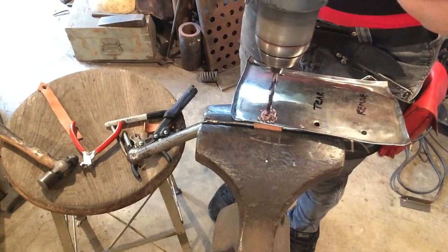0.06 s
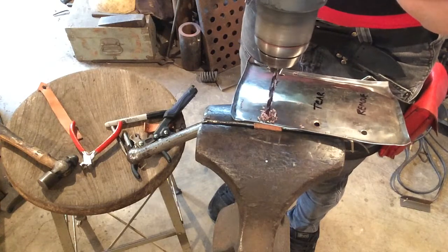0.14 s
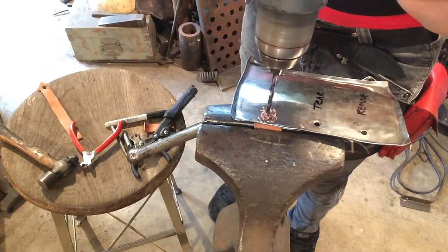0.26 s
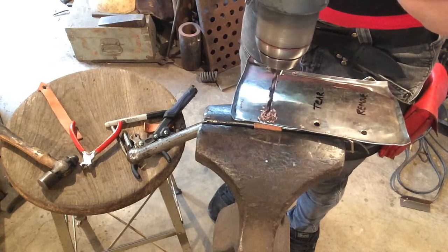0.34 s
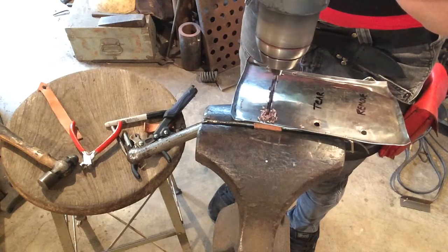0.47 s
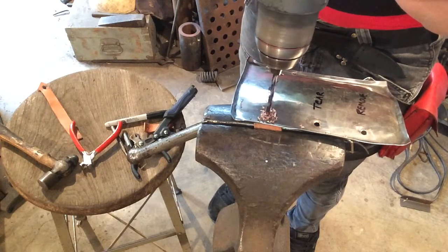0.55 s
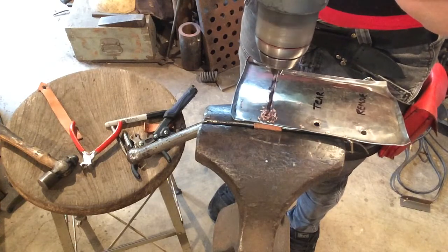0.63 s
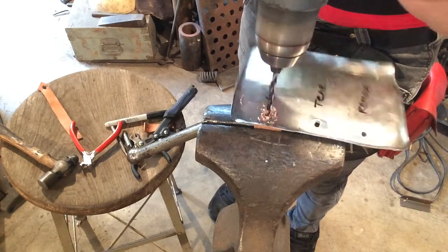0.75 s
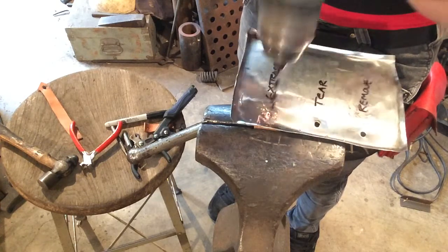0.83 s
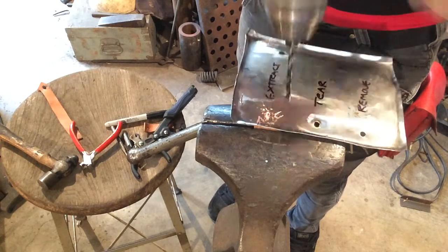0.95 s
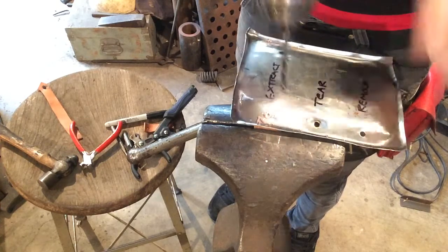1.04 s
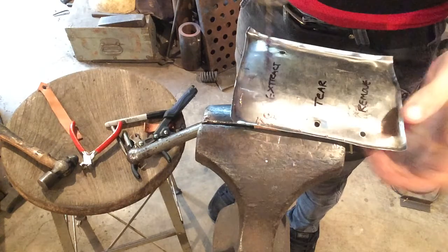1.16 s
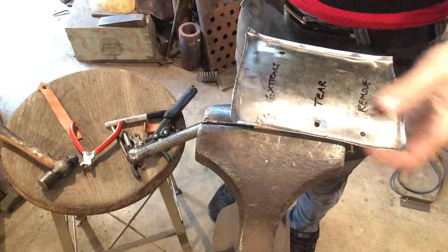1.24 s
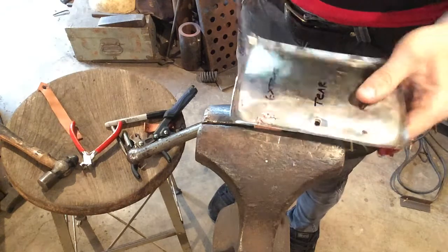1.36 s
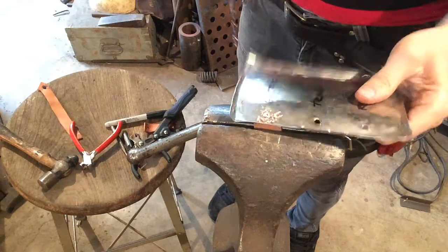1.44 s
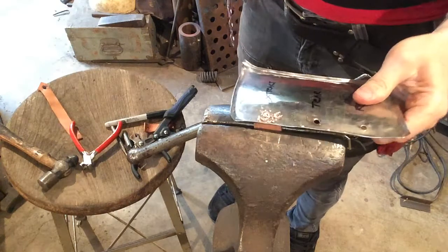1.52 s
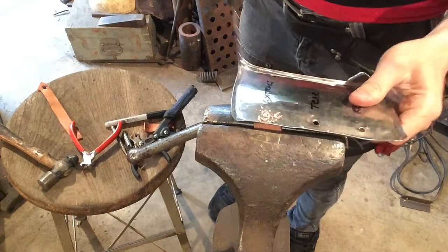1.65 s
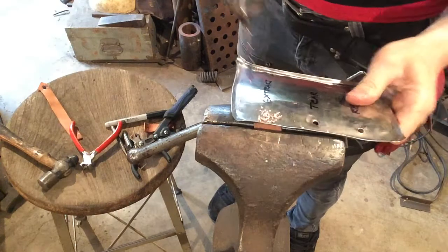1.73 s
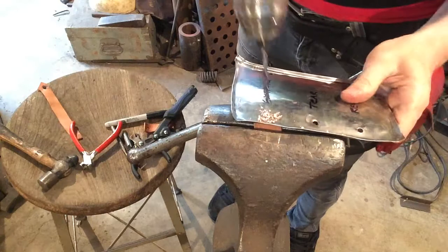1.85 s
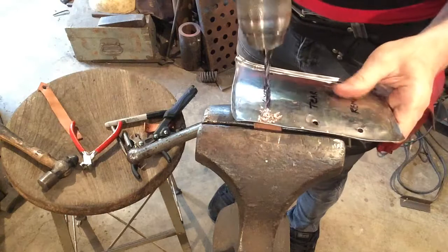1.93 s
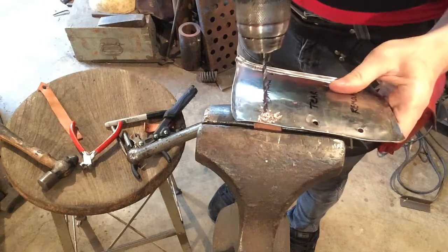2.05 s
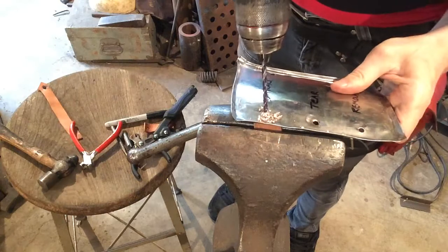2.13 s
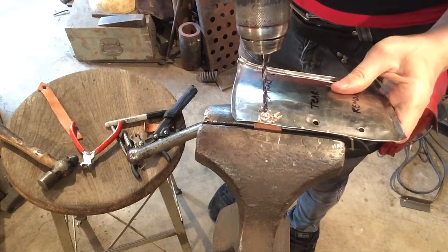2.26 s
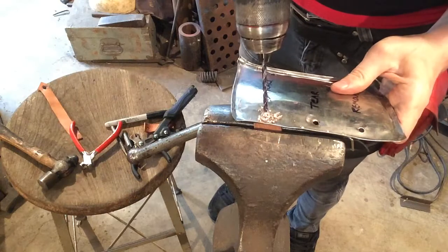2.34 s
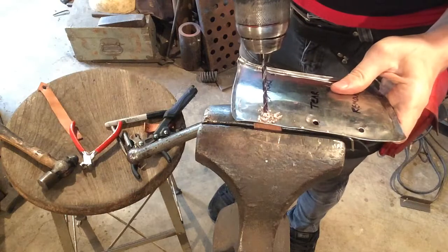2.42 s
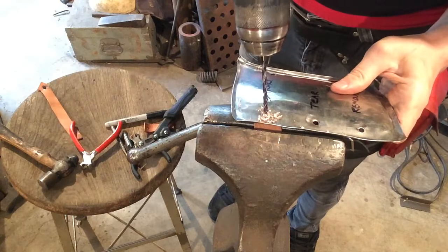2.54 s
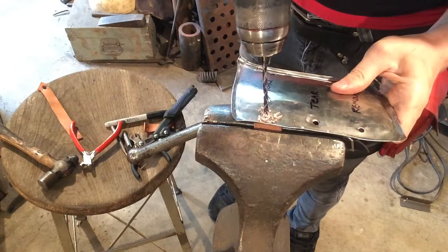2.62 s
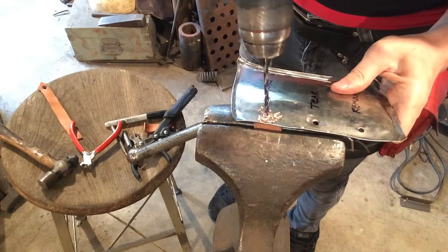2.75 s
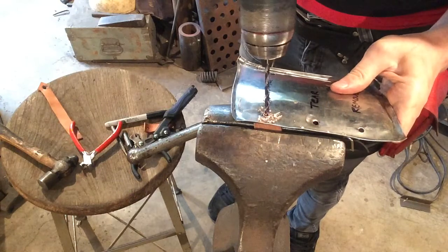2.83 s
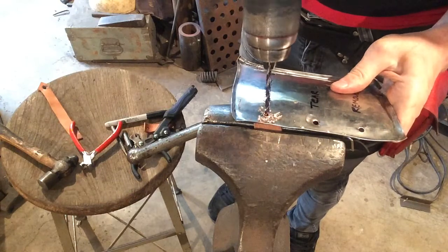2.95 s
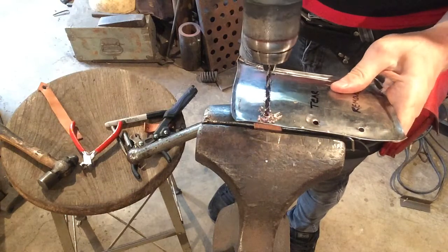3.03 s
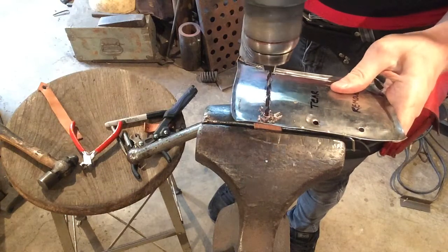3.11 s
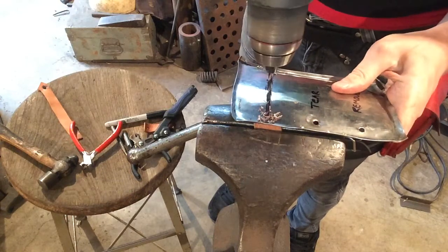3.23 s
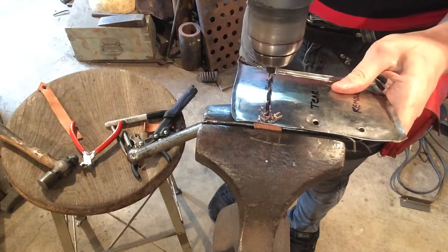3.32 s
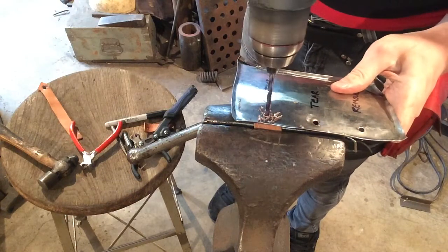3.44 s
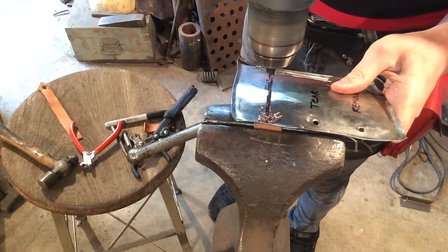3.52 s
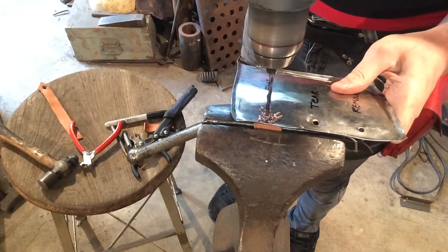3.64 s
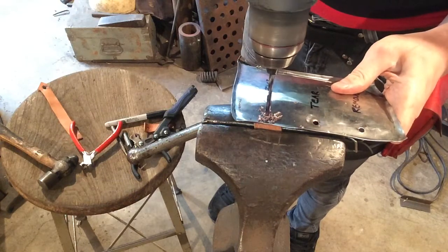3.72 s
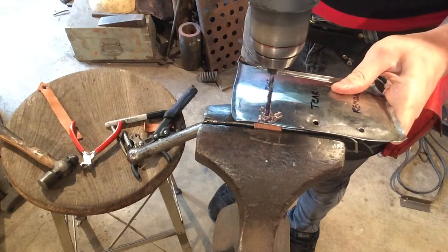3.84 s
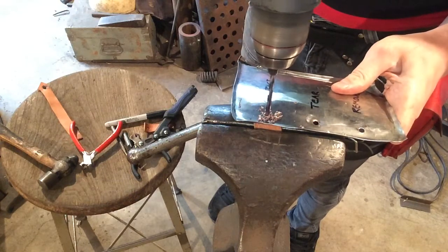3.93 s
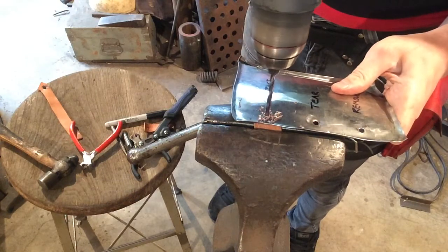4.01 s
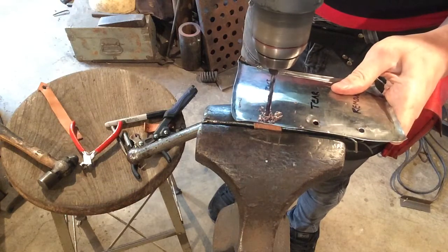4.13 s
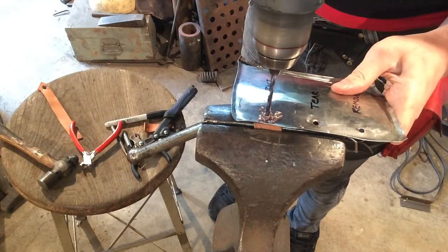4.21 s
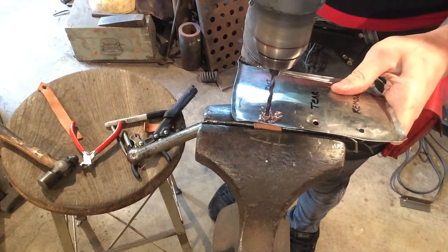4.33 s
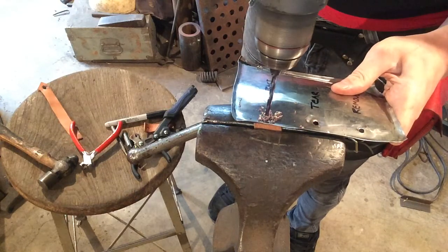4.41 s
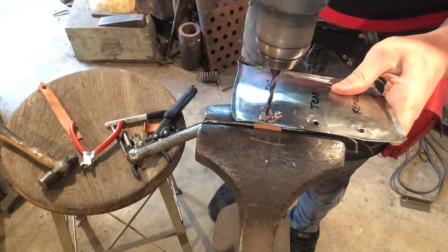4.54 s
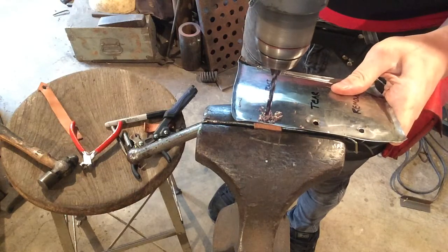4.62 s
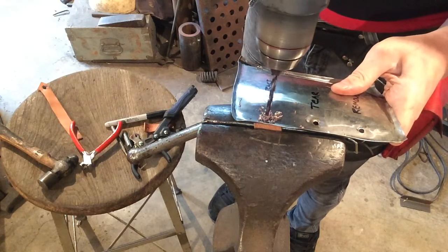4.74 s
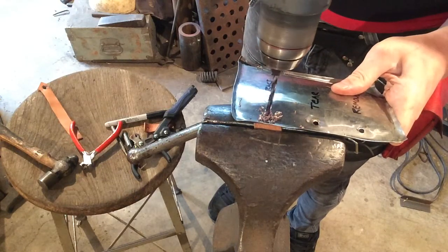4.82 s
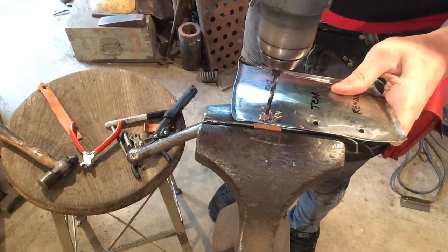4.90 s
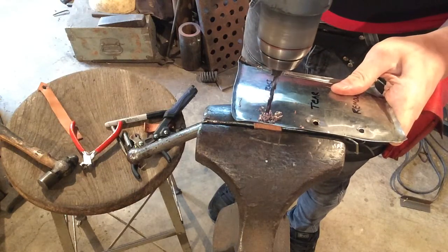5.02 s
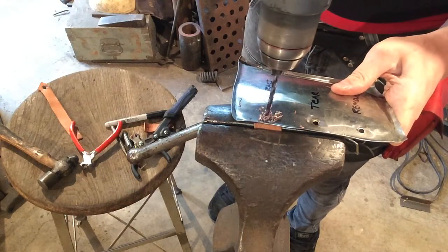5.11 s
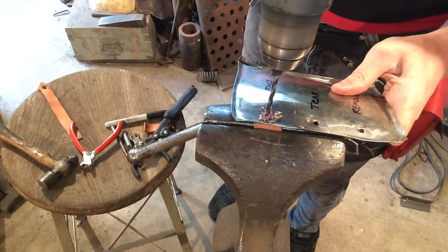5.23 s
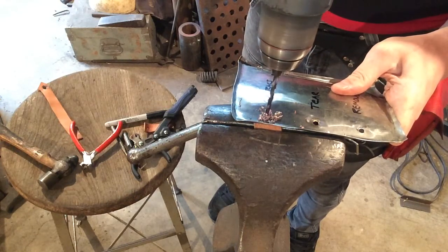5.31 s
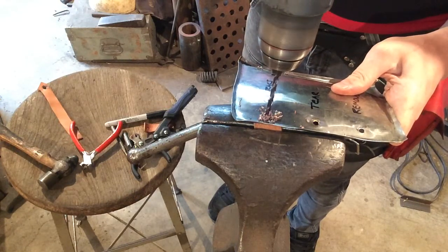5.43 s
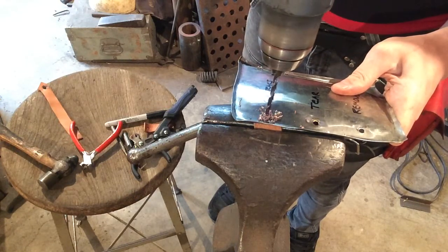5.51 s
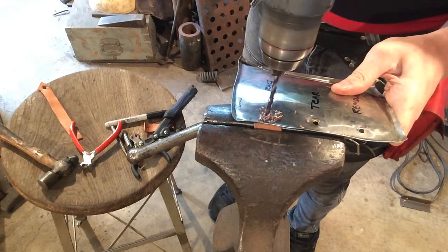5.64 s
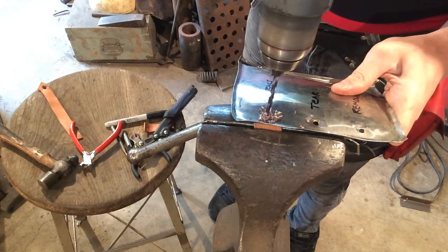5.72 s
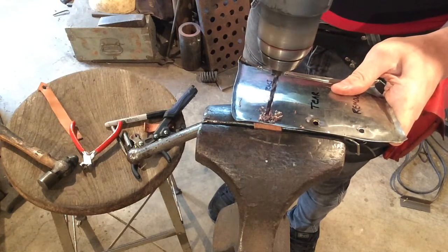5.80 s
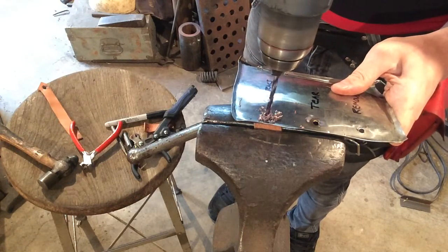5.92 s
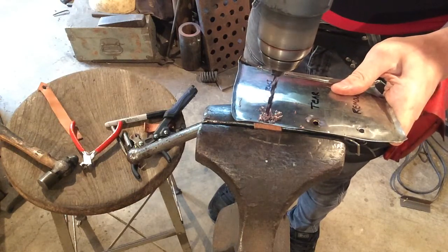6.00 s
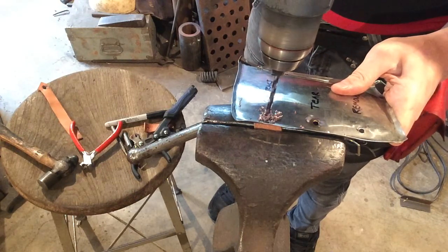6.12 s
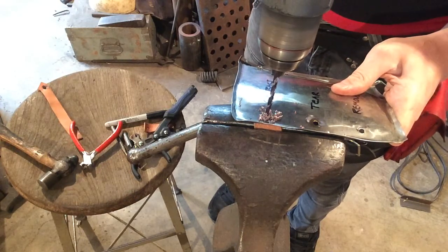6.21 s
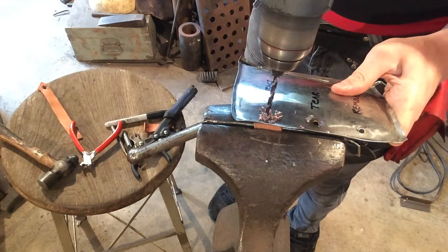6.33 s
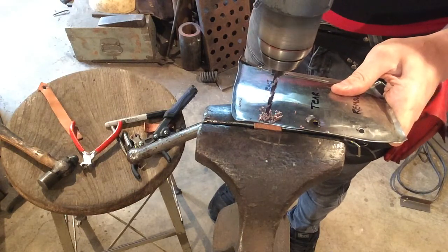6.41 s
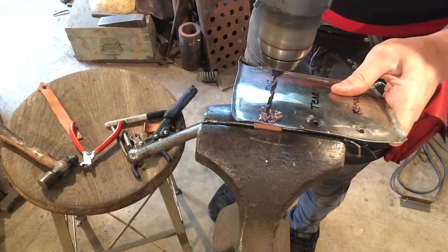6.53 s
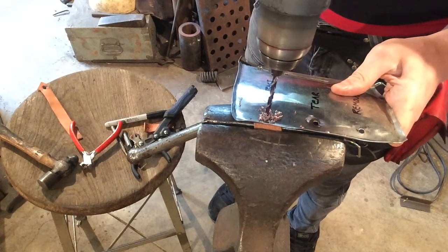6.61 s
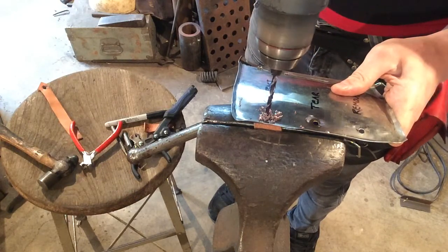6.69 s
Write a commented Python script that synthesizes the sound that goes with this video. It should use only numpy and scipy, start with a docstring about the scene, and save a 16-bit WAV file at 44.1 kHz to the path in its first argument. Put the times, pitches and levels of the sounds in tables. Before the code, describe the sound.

A cordless drill whines and scrapes into a metal plate, stops with a clack, then spins up and bites again.

```python
"""A cordless drill whines and scrapes, boring out a rivet in a steel plate on an anvil, then stops with a clack.
A hand shifts the plate and the bit taps it. The drill restarts, spins up almost freely and slows as
the bit bites. Shaft harmonics, gear mesh and the speed controller's switching tones sweep through
the housing resonances, over gear rattle and scraping, in a small workshop."""
import sys
import numpy as np
from scipy import signal
from scipy.fft import rfft, irfft
from scipy.io import wavfile
from scipy.ndimage import uniform_filter1d

SR = 44100
rng = np.random.default_rng(int(sys.argv[2]) if len(sys.argv) > 2 else 0)


def wav_record(signal):
    """Record a signal, one row per channel, as 16-bit PCM in the file named by sys.argv[1]."""
    frames = np.transpose(np.atleast_2d(signal))
    bounded = np.clip(frames, -1, 1)
    # unit amplitude maps onto the largest positive 16-bit level
    quanta = np.round(bounded * 32767).astype(np.int16)
    wavfile.write(sys.argv[1], SR, quanta)


N = 298116
TIME = np.arange(N) / SR
EASE_S, LOCK_S, RESTART_S, GRAZE_S, BITE_S = 0.86, 1.02, 3.14, 4.385, 4.448
FIRST_RUN = TIME < RESTART_S
CUT_SPEED_HZ, SWITCH_HZ = 180, 7976
GEAR_TEETH, ROTOR_COGS = 16, 20

# Settled shaft speed in the cut: time_s, speed_hz
CUT_SPEEDS = [(0, 184.8), (.22, 185), (.37, 180.7), (.62, 184.4), (.82, 186.7), (4.45, 181.5),
              (5.47, 181.8), (5.67, 178.1), (5.93, 181), (6.25, 181.3), (6.4, 177.6), (6.7, 175.9)]
# Approach to free speed after the soft start: gained_hz, lag_s
SPIN_UP_STAGES = [(44.8, .0374), (104, .2367)]
# Housing resonances: centre_hz, width_hz, level_db
HOUSING_MODES = [(750, 130, -17), (2000, 400, -15), (2655, 30, -1.5), (2880, 330, 0), (4090, 45, -11),
                 (6450, 200, -14)]
# Motor shaft harmonics: multiple, free_db, loaded_db
SHAFT_HARMONICS = [(4, -31, -38.5), (7, -48, -47), (8, -33.5, -44), (9, -47, -40), (10, -35.5, -48),
                   (12, -47, -51), (13, -39, -52), (14, -34, -44.5), (26, -39, -44), (29.7, -40, -44)]
# Controller tones: switch_multiple, offset_shaft_multiples, free_db, loaded_db
SWITCHING_TONES = [(1, -20, -31.5, -58), (1, -4, -29, -32), (1, 4, -30, -37.5), (1, 0, -47, -49),
                   (1, 20, -42, -50), (2, -4, -39, -44.5)]
# Brief dip of those tones: centre_s, width_s, gain_db
SWITCHING_DIP = (5.2, 0.28, -10)
# Bit jerks the plate and jolts the gears: centre_s, width_s, rattle_gain_db, cogging_gain_db
GEAR_JOLTS = [(.82, .05, -1.5, 12), (0.893, .025, 6.5, -5), (3.93, 0.025, 4, -5), (4.13, 0.012, 2, -5),
              (5.034, 0.016, 3.5, -2)]
# Scrape and rattle level laws: base_db, speed_db_per_octave, surge_db, ease_share
SCRAPE_LEVEL = (-41, 3.5, 4.5, 0.8)
RATTLE_LEVEL = (-49, 11, 2.5, 0.3)
# Bit scrape and gear rattle spectra: freq_hz, level_db
SCRAPE_SPECTRUM = [(400, -23.5), (1100, -7), (1700, -0.5), (2450, 3), (2920, 10.5), (3350, 5.5), (4000, 3),
                   (5000, 2), (5700, 0), (6600, 3), (8000, -5.5), (10000, -9.5), (13300, -15.5),
                   (15000, -17.5)]
RATTLE_SPECTRUM = [(90, -41), (250, -14), (380, -8.5), (570, -7), (770, 2), (920, -2), (1120, -6.5),
                   (1550, -6), (2200, -9), (5000, -26.5), (15000, -28)]
# Bit snags, whine drops: centre_s, depth_db, width_s
BIT_SNAGS = [(0, 8.5, 0.035), (0.15, 3.5, 0.054), (0.312, 22, 0.0048), (0.394, 29, 0.02), (0.474, 22, 0.01),
             (0.639, 9, 0.098), (.752, 10, 0.013), (0.78, 5, 0.023), (5.14, 22, 0.0063), (5.306, 11, .0038),
             (5.438, 6, 0.005), (5.533, 9, 0.013), (5.59, 12, 0.0068), (5.634, 7, 0.018),
             (5.87, 2.5, 0.074), (5.911, 22, 0.0048), (6.007, 12, 0.016), (6.101, 5, .008),
             (6.194, 13, 0.0062), (6.239, 5, 0.04)]
# Teeth pressed together, whine flares: centre_s, gain_db, width_s
WHINE_FLARES = [(0.3, -0.5, 0.018), (.44, 1, .02), (.72, 4, .02), (3.289, 2.5, .025), (5.034, 2.5, 0.045),
                (5.283, 4, .02), (5.374, 3.5, 0.073), (5.475, 6, 0.016), (5.567, 2.5, .015),
                (5.687, 2.5, 0.057), (6.145, 1.5, 0.029), (6.337, 3, .04)]
# Workshop background spectrum: freq_hz, level_db
ROOM_SPECTRUM = [(15, -39), (25, -16), (95, 0.5), (176, -5), (224, -9), (363, -10), (501, -17),
                 (573, -17.5), (1090, -20.5), (1960, -24), (4620, -30.5), (15000, -39.5)]
# Spindle lock blows at stop and start: start_s, click_db, ring_db
LOCK_BLOWS = [(1.0174, -28, -21.5), (1.022, -35, -31), (1.0714, -44.5, -54), (3.1468, -43, -23)]
# Click spectrum of a blow: freq_hz, level_db
CLICK_SPECTRUM = [(150, -11), (600, -8), (1100, 1), (1700, -3), (2600, -1), (3700, -4), (7000, -7),
                  (10000, -17.5), (15000, -19)]
# Hand slides over the plate: centre_s, width_s, level_db
HAND_RUBS = [(1.374, 0.068, -70.5), (1.822, 0.1, -76.5), (2.06, 0.075, -74)]
# Spectra of skin on plate and plate on anvil: freq_hz, level_db
RUB_SPECTRUM = [(1500, 0), (3900, 3), (5500, -0.5), (12000, -2), (15000, -4.5)]
SHIFT_SPECTRUM = [(800, -17.5), (1100, 6), (1400, -11.5), (3300, -12.5), (3900, -3), (4600, -18),
                  (9000, -20)]
# Bit touches the plate: start_s, level_db, tilt_db_per_octave, rise_s, scuff_t60_s, ring_gain_db
BIT_TAPS = [(2.189, -61.5, -0.5, 0.0033, 0.15, -32.5), (2.236, -58.5, -0.5, 0.0024, 0.068, -30),
            (2.6276, -46, -3.5, 0.0022, 0.051, -32), (2.692, -56.5, -6, .003, .05, -30),
            (2.825, -62, 0, 0.0093, 0.42, -19), (2.861, -38, 0, 0.0023, 0.026, -15)]
# Scuff spectrum of a touch: freq_hz, level_db
SCUFF_SPECTRUM = [(100, -11), (400, -1.5), (800, -3), (1400, 2), (2500, -7.5), (4000, -3), (8000, -16.5),
                  (15000, -16)]
# Steel plate modes: pitch_hz, level_db, t60_s
PLATE_MODES = [(2460, -4, 0.15), (3100, -15, 0.15), (5400, -28, 0.42), (5959, -18, 0.3), (6340, -8, 0.16),
               (6300, -4.5, 0.13), (7940, -20, 0.25), (8775, -20, 0.22)]


def undb(db):
    """Decibels to gain."""
    return 10 ** (np.asarray(db) / 20)


def since(start_s):
    """Seconds since start_s, zero before."""
    return np.maximum(TIME - start_s, 0)


def rise(start_s, lag_s):
    """Exponential approach from 0 to 1."""
    return 1 - np.exp(-since(start_s) / lag_s)


def bump(centre_s, width_s):
    """Gaussian swell, peak 1."""
    return np.exp(-np.minimum(((TIME - centre_s) / width_s) ** 2, 20))


def fade(t, t60_s):
    """Exponential decay."""
    return np.exp(-np.log(1000) * t / t60_s)


def add(track, start_s, sound):
    """Mix a sound in at start_s."""
    i = int(start_s * SR)
    track[i:i + len(sound)] += sound[:N - i]


def walk(rate_hz):
    """Smooth random drift, spread near 1."""
    hold = max(int(SR / rate_hz), 1)
    steps = np.repeat(rng.standard_normal(N // hold + 1), hold)
    return 1.248 * uniform_filter1d(uniform_filter1d(steps, hold), hold)[:N]


def grit(spread_db):
    """Dense tiny impacts of uneven size, rms 1."""
    size = undb(spread_db * np.repeat(rng.standard_normal(N // 16 + 1), 16)[:N])
    impacts = size * rng.standard_normal(N)
    return impacts / np.sqrt(np.mean(impacts ** 2))


def colour(x, spectrum, tilt_db_per_octave=0):
    """Minimum-phase filter of unit power through a spectrum table."""
    hz, db = np.transpose(spectrum)
    octave = np.log2(np.maximum(np.fft.rfftfreq(4096, 1 / SR), 1))
    tilt_db = tilt_db_per_octave * np.maximum(octave, np.log2(hz[0]))
    cepstrum = irfft(np.log(undb(np.interp(octave, np.log2(hz), db) + tilt_db)))
    cepstrum[1:2048] *= 2
    cepstrum[2049:] = 0
    response = irfft(np.exp(rfft(cepstrum)))
    return signal.fftconvolve(x, response / np.linalg.norm(response))[:len(x)]


def tone(hz, waver_db, rough):
    """Sine of wavering level with a noise skirt from uneven tooth contacts."""
    skirt = 1 + rough * (walk(160) + 1j * walk(160))
    turns = rng.random() + np.cumsum(hz) / SR
    return np.sqrt(2) * undb(waver_db * walk(22.12)) * np.imag(skirt * np.exp(2j * np.pi * turns))


def housing(hz, floor_db=-20):
    """Radiation gain of the resonant housing."""
    power = sum(undb(db) ** 2 / (1 + ((hz - centre_hz) / width_hz) ** 2) ** 2
                for centre_hz, width_hz, db in HOUSING_MODES)
    return np.sqrt(power + undb(floor_db) ** 2)


def drive(ramp_s=0.08, ramp_top_hz=117.8, coast_hz_per_s=240, ease_db_per_s=-57):
    """Shaft speed; bit load, cut depth, starting torque surge (each 0-1); drop as the trigger eases."""
    graze = 0.92 * bump(GRAZE_S, 0.037)
    load = np.where(FIRST_RUN, 1, np.maximum(rise(BITE_S, lag_s=0.13), graze))
    cut = np.where(FIRST_RUN, 1, rise(BITE_S, lag_s=0.299))
    surge = np.where(FIRST_RUN, 0, 1 - rise(RESTART_S, lag_s=0.64))
    free_hz = ramp_top_hz * np.minimum(since(RESTART_S) / ramp_s, 1)
    free_hz += sum(gained_hz * rise(RESTART_S + ramp_s, lag_s) for gained_hz, lag_s in SPIN_UP_STAGES)
    cutting_hz = np.interp(TIME, *np.transpose(CUT_SPEEDS))
    eased_s = FIRST_RUN * since(EASE_S)
    speed_hz = np.maximum(free_hz + cut * (cutting_hz - free_hz) - coast_hz_per_s * eased_s, 0)
    speed_hz *= 1 + 0.000983 * walk(40)  # uneven cutting load
    return speed_hz, load, cut, surge, ease_db_per_s * eased_s


def shaft(speed_hz, load, surge):
    """Shaft harmonics radiated by the housing; load shifts their balance."""
    out = 0
    for multiple, free_db, loaded_db in SHAFT_HARMONICS:
        hz = multiple * speed_hz
        level_db = free_db + load * (loaded_db - free_db)
        out += undb(level_db) * housing(hz) * tone(hz, waver_db=2.5, rough=0.2)
    return undb(-1 - 3 * surge) * out


def controller(speed_hz, load, spun_up):
    """Switching whistles; their sidebands spread with shaft speed."""
    out = 0
    for multiple, offset, free_db, loaded_db in SWITCHING_TONES:
        hz = multiple * SWITCH_HZ + offset * speed_hz
        onset = spun_up ** 2 if abs(offset) == ROTOR_COGS else 1  # cogging sideband
        level_db = free_db + load * (loaded_db - free_db)
        out += onset * undb(level_db) * housing(hz) * tone(hz, waver_db=1.56, rough=0.065)
    centre_s, width_s, dip_db = SWITCHING_DIP
    return undb(-2.5 + dip_db * bump(centre_s, width_s)) * out


def cogging(speed_hz, surge, base_db=-45, surge_db=18.5):
    """Rotor cogging tone, raised by starting torque and shaken by jolts."""
    hz = ROTOR_COGS * speed_hz
    jolt_db = sum(db * bump(centre_s, width_s) for centre_s, width_s, _, db in GEAR_JOLTS)
    level_db = base_db + surge_db * surge ** 2 + jolt_db
    return undb(level_db) * np.sqrt(housing(hz)) * tone(hz, waver_db=3.5, rough=0.16)


def motor(speed_hz, load, surge, ease_db, first_run_db=1.5):
    """Shaft, controller and cogging tones; a slow rotor hardly sings."""
    spun_up = np.clip(speed_hz / 150, 0, 1) ** 3
    tones = spun_up * shaft(speed_hz, load, surge)
    tones += controller(speed_hz, load, spun_up)
    tones += spun_up * cogging(speed_hz, surge)
    return undb(ease_db + first_run_db * FIRST_RUN) * tones


def unbalance_hum(speed_hz, cut, base_db=-71):
    """Unbalance shakes the body once a turn, most near full speed and deep in the cut."""
    near_full = np.exp(-((speed_hz - 264) / 22) ** 2)
    lifted = FIRST_RUN * rise(0.68, lag_s=0.03)  # plate rides up the bit, off the anvil
    level_db = base_db + 4.5 * cut ** 20 + 15 * near_full - 9 * lifted
    spun_up = np.clip(speed_hz / CUT_SPEED_HZ, 0, 1) ** 6
    return undb(level_db) * spun_up * tone(speed_hz, waver_db=1, rough=0.15)


def scrape_and_rattle(speed_hz, load, surge, ease_db):
    """Bit scrapes, gears rattle. Both grow with speed and torque and pulse with the shaft when slack."""
    angle = 2 * np.pi * np.cumsum(speed_hz) / SR
    pulse = 1 + 0.087 * (1 - load) * (np.cos(angle) + np.cos(4 * angle) + np.cos(8 * angle))
    octaves = np.log2(np.maximum(speed_hz, 55) / CUT_SPEED_HZ)
    scrape_db, rattle_db = (base_db + db_per_octave * octaves + surge_db * surge + share * ease_db
                            for base_db, db_per_octave, surge_db, share in (SCRAPE_LEVEL, RATTLE_LEVEL))
    scrape_db += 0.95 * FIRST_RUN
    rattle_db += 1.5 * FIRST_RUN
    rattle_db += sum(db * bump(centre_s, width_s) for centre_s, width_s, db, _ in GEAR_JOLTS)
    scrape = colour(grit(spread_db=1.5) * pulse, SCRAPE_SPECTRUM) * undb(scrape_db + 0.78 * walk(35))
    rattle = colour(grit(spread_db=1.5) * pulse, RATTLE_SPECTRUM) * undb(rattle_db + 0.7 * walk(45))
    return scrape + rattle


def gear_whine(speed_hz, cut, surge, ease_db, base_db=-37, cut_db=6.5, surge_db=10):
    """Tooth mesh tone, loudest near the main resonance and under torque; falters at each snag."""
    hz = GEAR_TEETH * speed_hz
    level_db = base_db + cut_db * cut ** 7 + surge_db * surge + 0.26 * ease_db
    level_db += sum(db * bump(centre_s, width_s) for centre_s, db, width_s in WHINE_FLARES)
    level_db -= sum(db * bump(centre_s, width_s) for centre_s, db, width_s in BIT_SNAGS)
    meshing = np.clip(speed_hz / 172, 0, 1) ** 6  # slow teeth meet softly
    return undb(level_db) * meshing * housing(hz) * tone(hz, waver_db=-0.05, rough=0.14)


def room_tone(level_db=-67.5):
    """Steady low background noise."""
    return undb(level_db) * colour(rng.standard_normal(N), ROOM_SPECTRUM)


def reflections(x, t60_s=0.46, wet_db=-13, delay_s=0.004):
    """Dense echoes from walls and benches."""
    t = TIME[:SR // 2]
    tail = rng.standard_normal(len(t)) * fade(t, t60_s) * (t > delay_s)
    tail = colour(tail, [(200, 2.5), (3000, -4.0), (15000, 1.5)])
    return undb(wet_db) * signal.fftconvolve(x, tail / np.linalg.norm(tail))[:N]


def lock_clacks(ring_hz=2900, t60_s=0.012, chatter_s=3.1525, gap_s=0.0059, growth_db=1.7):
    """Spindle lock blows click and ring the housing; on restart it chatters until the gears hold."""
    out, t = np.zeros(N), TIME[:SR // 10]
    chatter = [(chatter_s + k * gap_s, -45.5 + k * growth_db, -25.5 + k * growth_db) for k in range(5)]
    for start_s, click_db, ring_db in LOCK_BLOWS + chatter:
        click = colour(rng.standard_normal(len(t)) * fade(t, t60_s), CLICK_SPECTRUM)
        ring = np.sin(2 * np.pi * ring_hz * t) * fade(t, t60_s) * (1 - np.exp(-t / 0.00034))
        add(out, start_s, undb(click_db) * click + undb(ring_db) * ring)
    return out


def plate_handling(shift_db=-79.5):
    """Skin slides over steel; the plate sings faintly as it shifts on the anvil."""
    swells = sum(undb(db) * bump(centre_s, width_s) for centre_s, width_s, db in HAND_RUBS)
    skin = swells * colour(grit(spread_db=2.5), RUB_SPECTRUM)
    shift = undb(shift_db) * bump(1.7, 0.6) * colour(grit(spread_db=2), SHIFT_SPECTRUM)
    return skin + shift


def bit_taps():
    """Each touch of the bit scuffs and rings the plate."""
    out, t = np.zeros(N), TIME[:SR // 2]
    for start_s, level_db, tilt_db_per_octave, rise_s, scuff_t60_s, ring_gain_db in BIT_TAPS:
        burst = rng.standard_normal(len(t)) * fade(t, scuff_t60_s)
        scuff = colour(burst, SCUFF_SPECTRUM, tilt_db_per_octave)
        ring = sum(undb(db) * np.sin(2 * np.pi * hz * t) * fade(t, t60_s) for hz, db, t60_s in PLATE_MODES)
        buzz = 1 + 1.5 * walk(400)[:len(t)]  # plate chatters on the anvil
        attack = 1 - np.exp(-t / rise_s)
        add(out, start_s, undb(level_db) * attack * (scuff + undb(ring_gain_db) * ring * buzz))
    return out


def scene():
    """Two drill runs with plate handling between; both channels alike."""
    speed_hz, load, cut, surge, ease_db = drive()
    running = np.where(FIRST_RUN, fade(since(LOCK_S), t60_s=0.11), rise(RESTART_S, lag_s=0.0062))
    drill = motor(speed_hz, load, surge, ease_db) + unbalance_hum(speed_hz, cut)
    drill += scrape_and_rattle(speed_hz, load, surge, ease_db)
    tools = running * drill + lock_clacks() + bit_taps() + plate_handling()
    room = room_tone() + reflections(tools)
    whine = running * gear_whine(speed_hz, cut, surge, ease_db)
    return np.tile(tools + room + whine, (2, 1))


def record(dry, cutoff_hz=15400):
    """One microphone with a steep top cut."""
    return signal.sosfilt(signal.ellip(12, 0.1, 80, cutoff_hz, fs=SR, output="sos"), dry)


dry = scene()
out = record(dry)
wav_record(out)
```